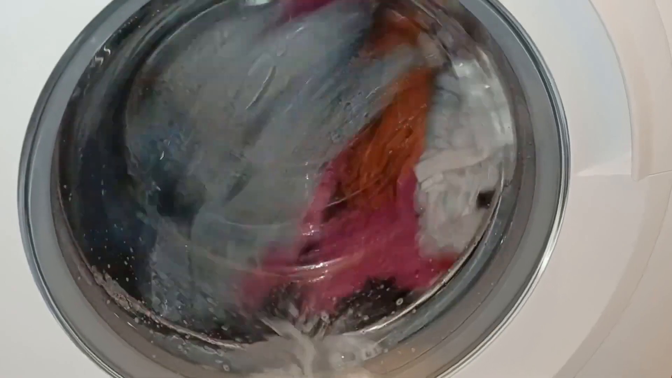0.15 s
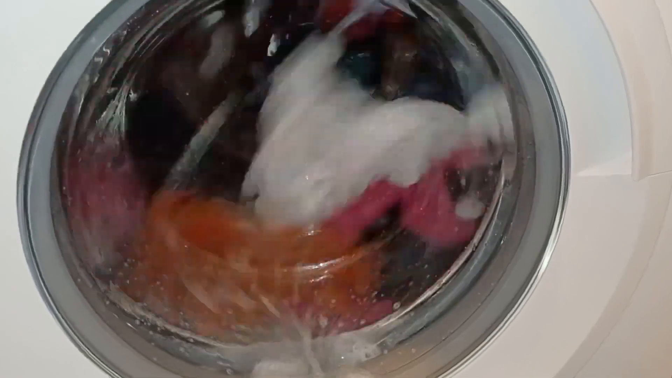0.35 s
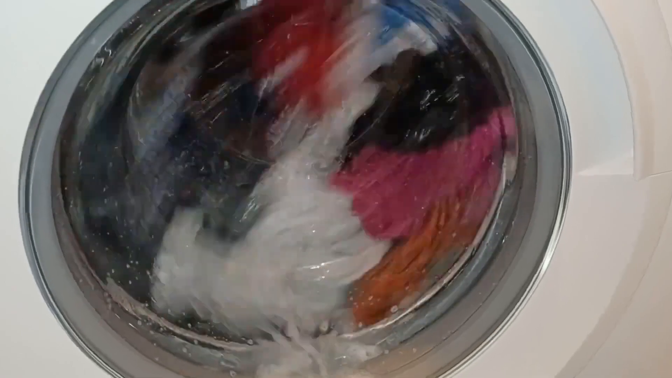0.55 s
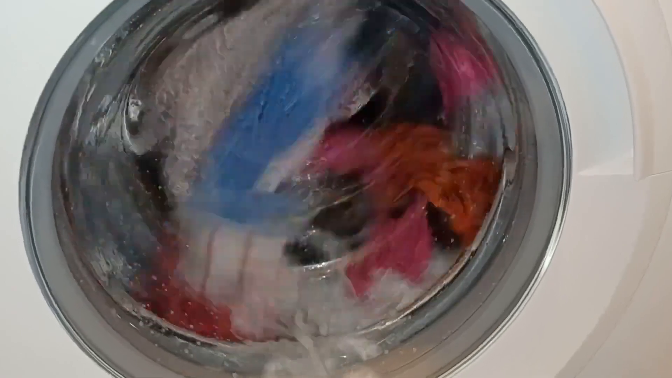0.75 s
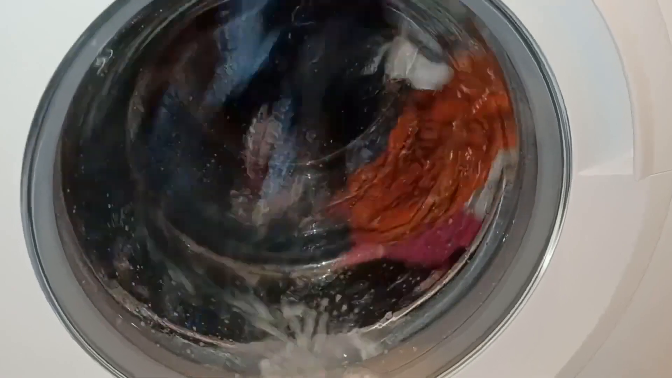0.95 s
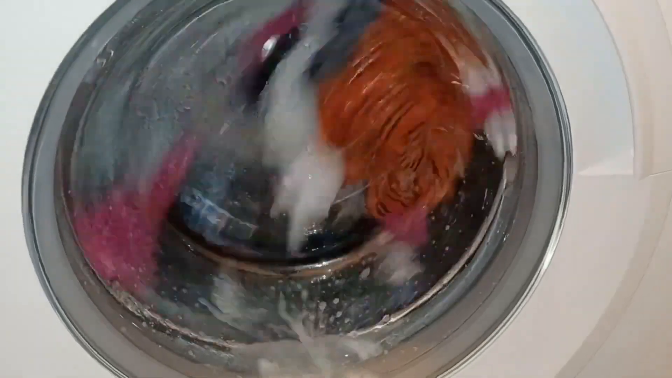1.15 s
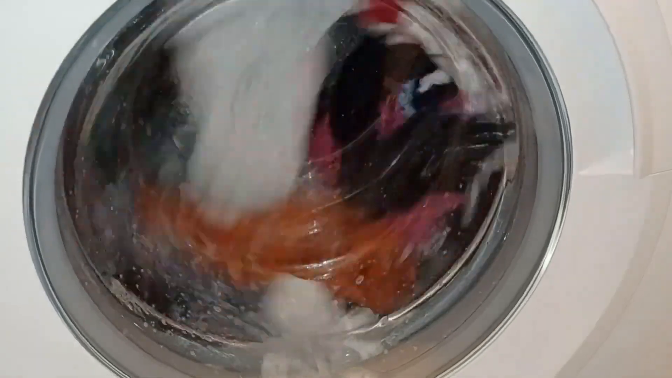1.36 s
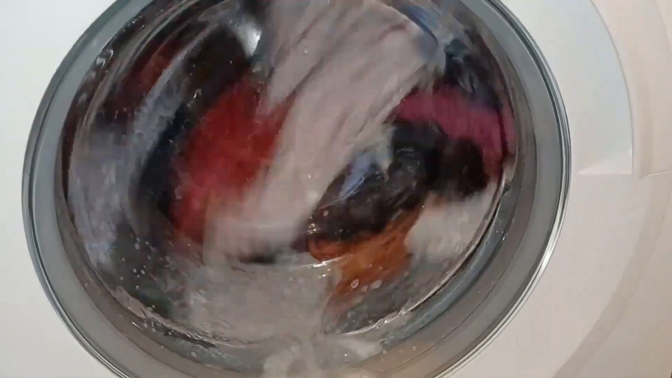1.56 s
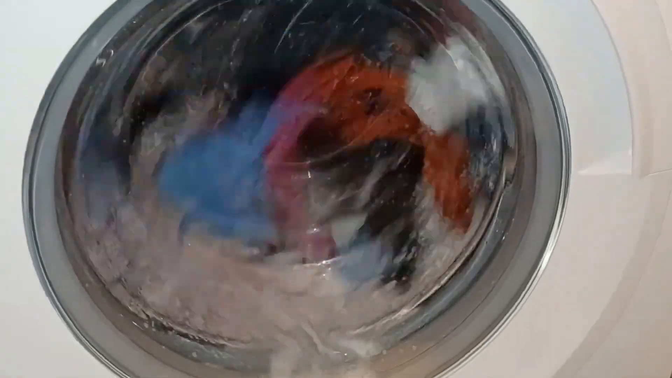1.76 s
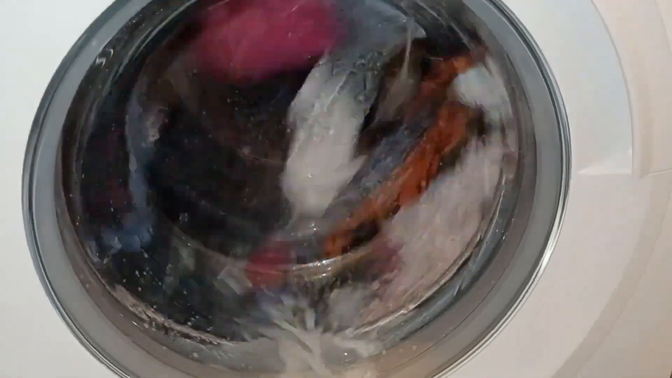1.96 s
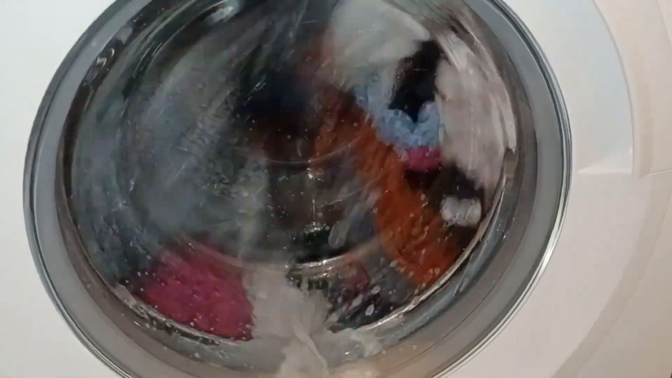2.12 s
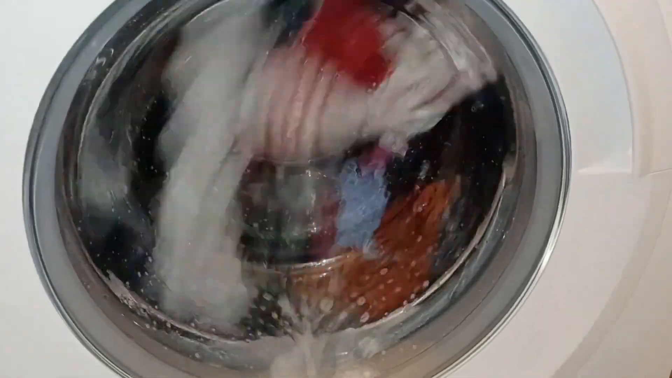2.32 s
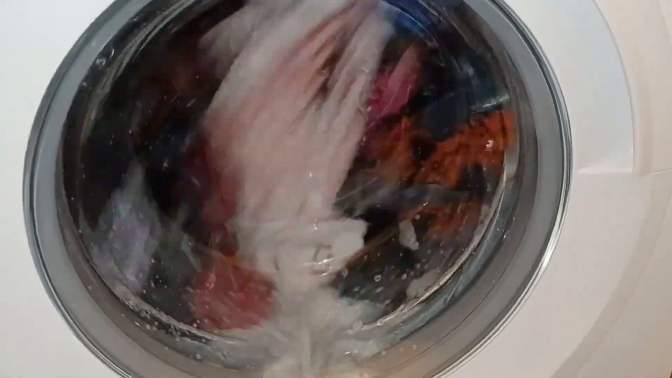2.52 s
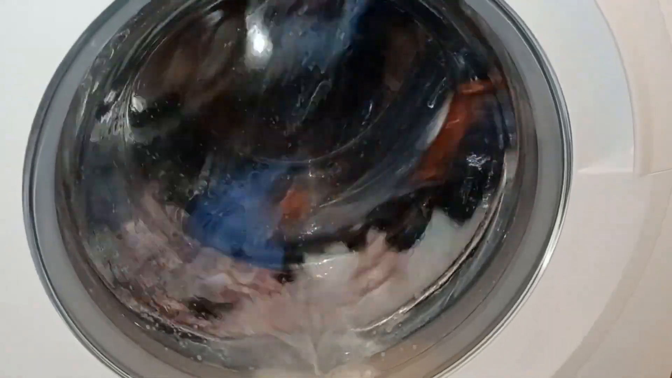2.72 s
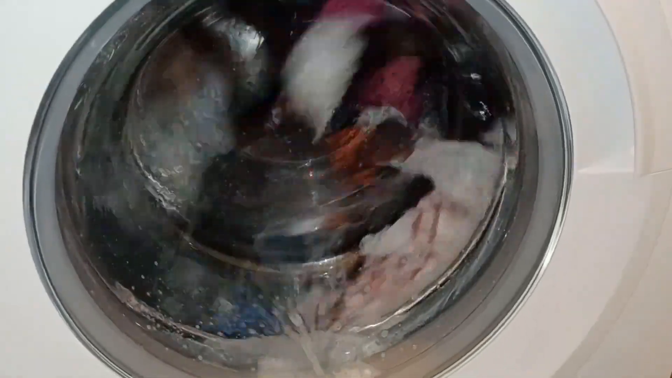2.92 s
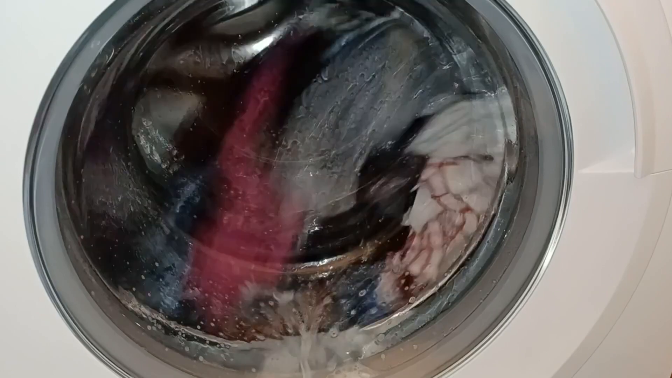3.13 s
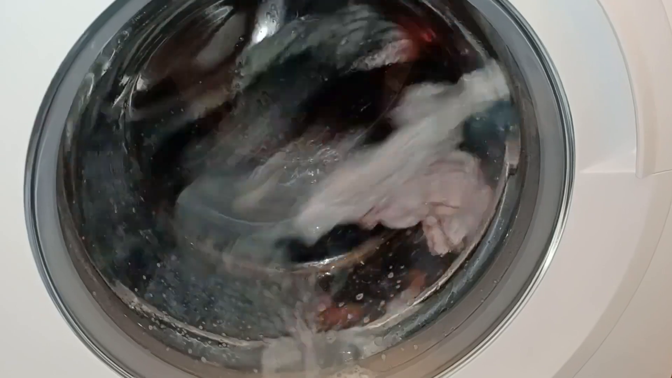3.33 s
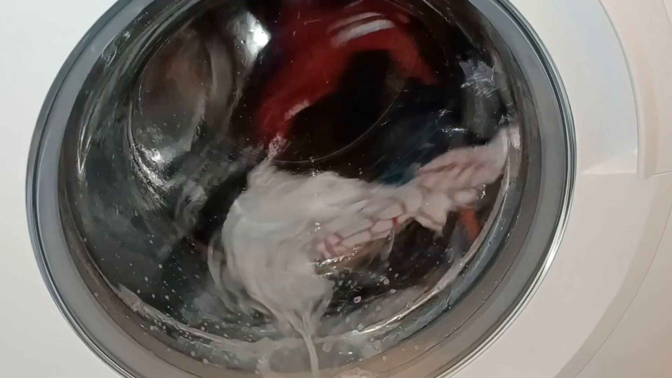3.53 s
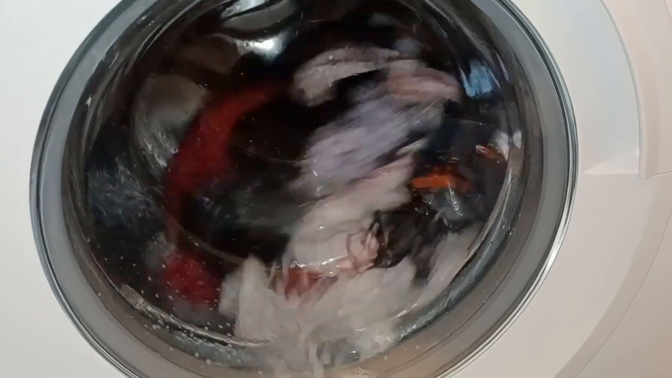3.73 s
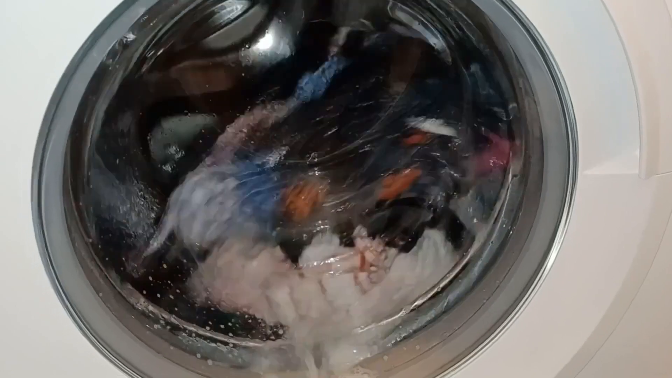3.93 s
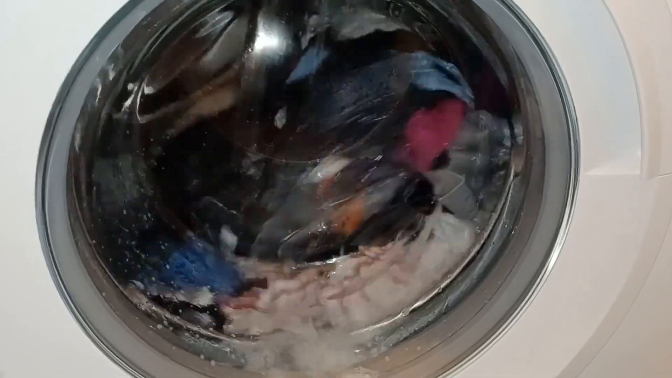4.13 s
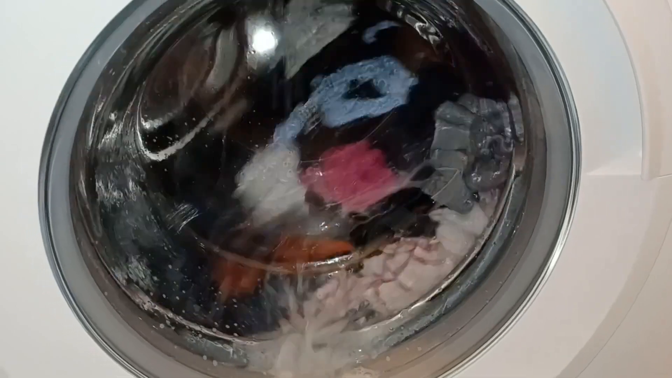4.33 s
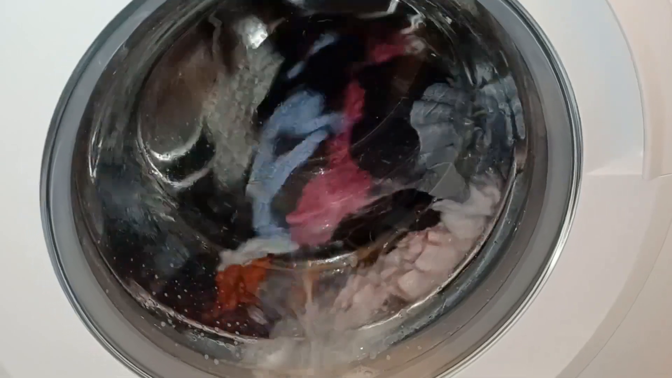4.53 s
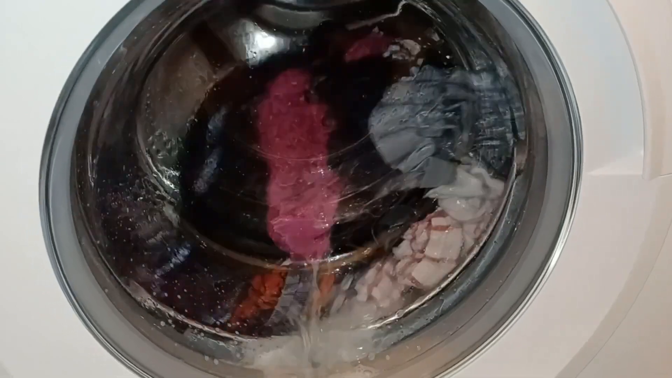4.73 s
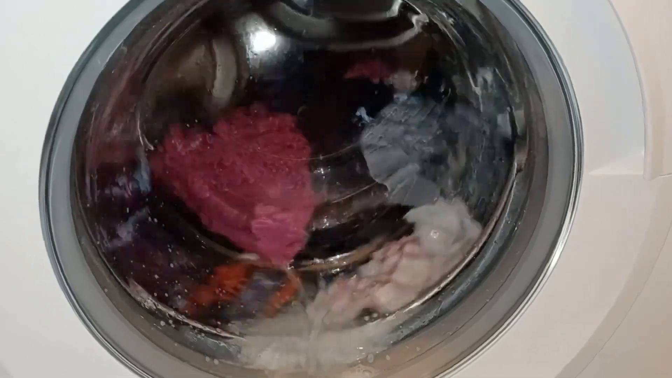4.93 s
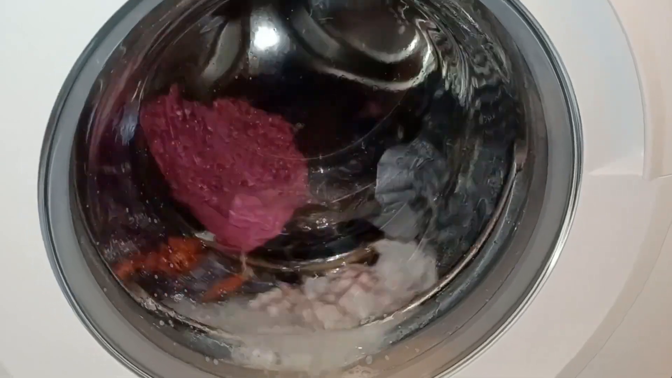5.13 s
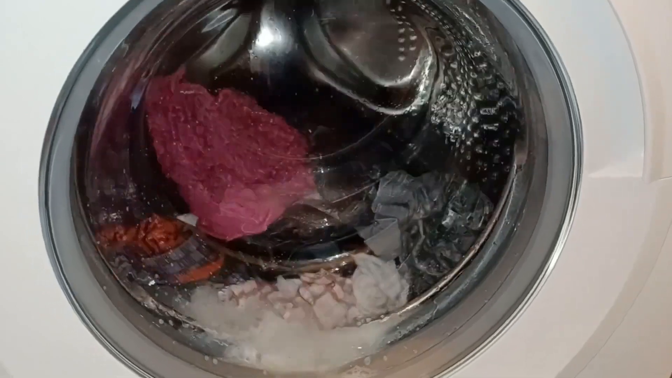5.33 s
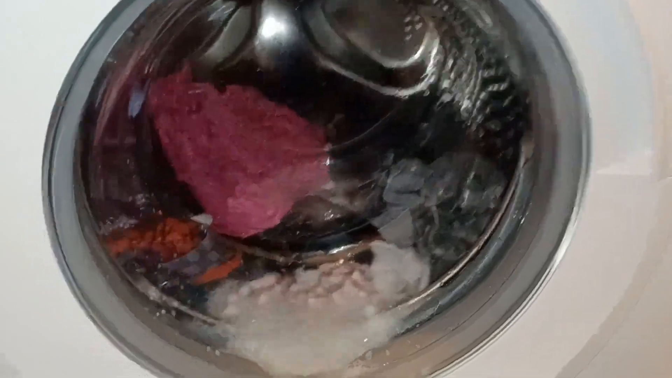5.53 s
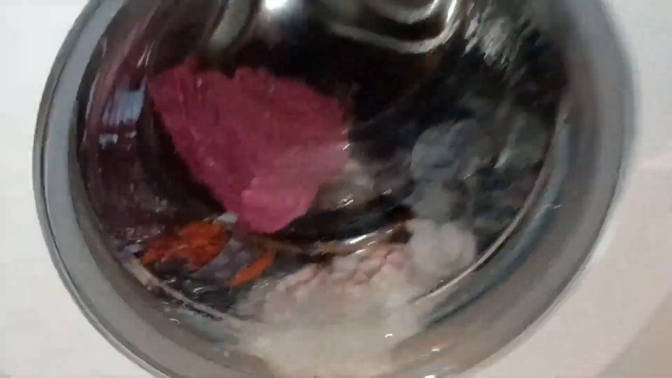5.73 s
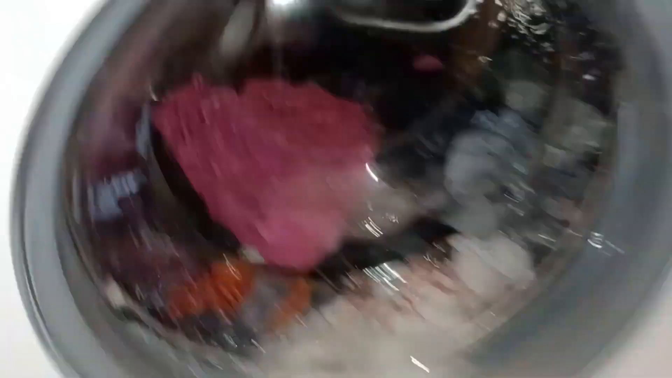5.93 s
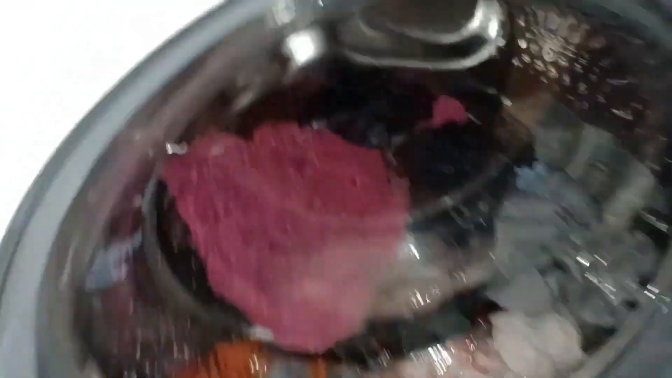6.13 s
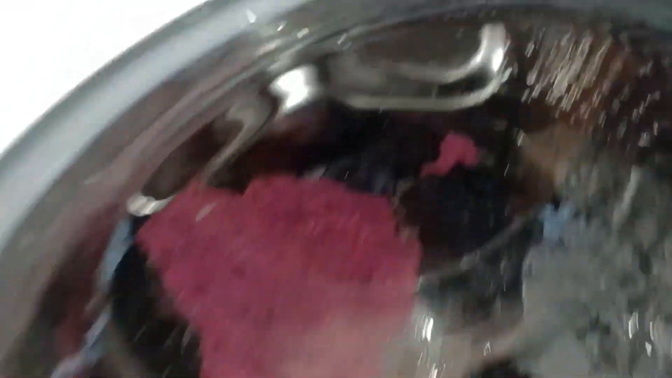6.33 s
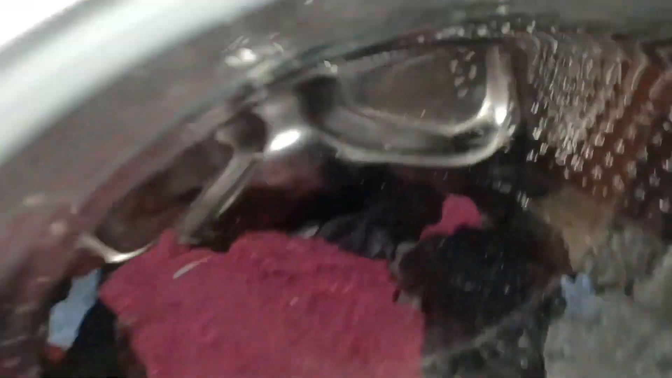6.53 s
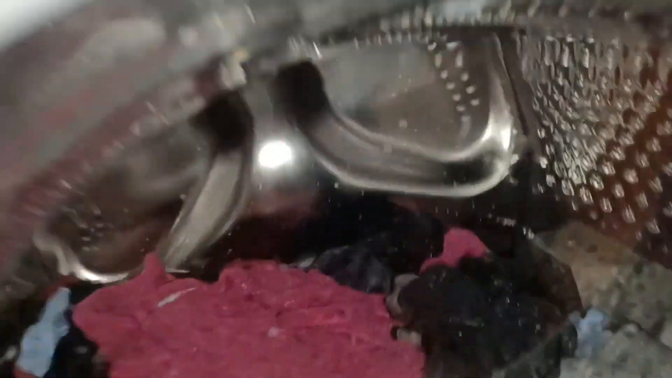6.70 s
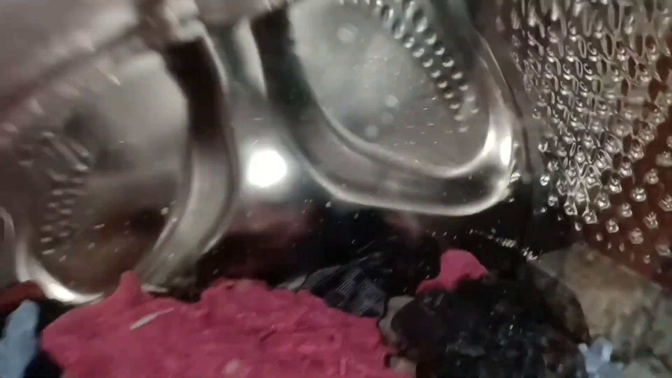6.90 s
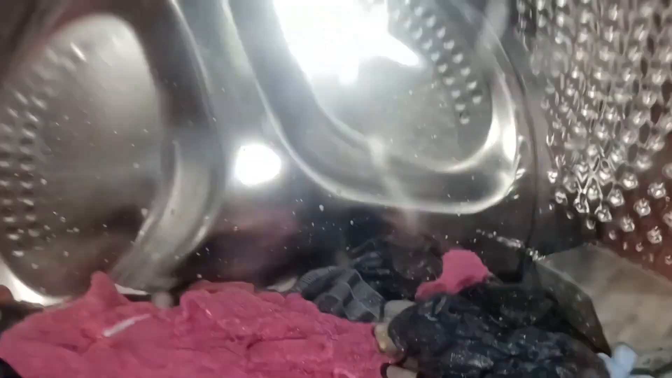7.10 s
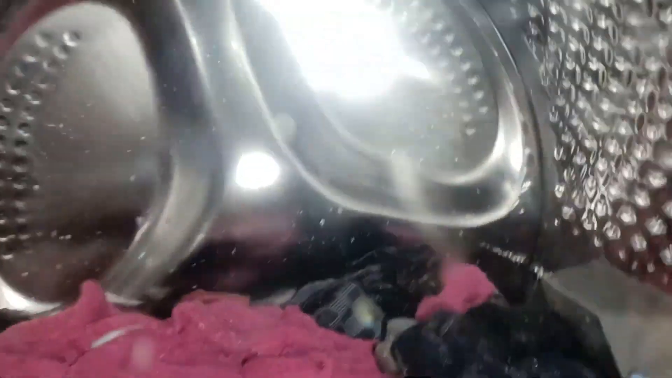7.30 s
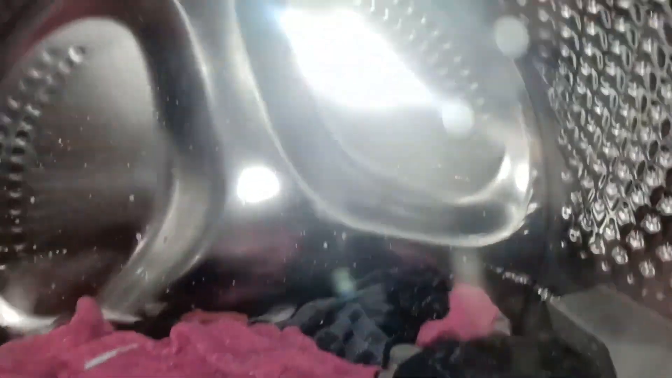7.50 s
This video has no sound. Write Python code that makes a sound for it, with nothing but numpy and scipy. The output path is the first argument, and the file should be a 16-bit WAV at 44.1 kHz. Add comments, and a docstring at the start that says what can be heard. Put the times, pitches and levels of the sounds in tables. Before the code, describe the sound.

Close to a front-loading washer indoors, wet clothes tumble rapidly with dull thuds, water slaps, bubbling slosh and spray on the glass. A faint low motor hum wavers beneath, and buttons tick on metal. Around four seconds the drum slows and stops with a last wet flop. Near quiet follows, then loud low handling bumps and rubbing as the camera moves closer to faintly fizzing foam.

```python
"""Front-loading washer with a handled camera

Wet laundry tumbles in suds over a wavering motor hum; buttons tick on the drum, which slows and stops.
A last fold slides into the water and foam is left fizzing. A hand then carries the camera up to the
door glass, rubbing and bumping its case. Textures and blows are noise bursts coloured by source and
place; bubbles, hum and case are decaying or steady sinusoids."""
import sys
import numpy as np
from scipy import signal
from scipy.fft import rfft, irfft, next_fast_len
from scipy.io import wavfile
from scipy.ndimage import uniform_filter1d

SR = 44100
rng = np.random.default_rng(int(sys.argv[2]) if len(sys.argv) > 2 else 0)


def waveform_to_disk(signal):
    """Save audio, clipped to [-1, 1], as 16-bit WAV at the path in sys.argv[1]."""
    frames = np.transpose(np.atleast_2d(signal))
    scaled = np.clip(frames, -1, 1) * 32767
    samples = np.round(scaled).astype(np.int16)
    wavfile.write(sys.argv[1], SR, samples)


N = 337806
TAPS = 16384  # length of one impact, samples
TIME = np.arange(N) / SR
CLOCK = TIME[::64]  # coarse time for gain curves
HZ, AGE = np.fft.rfftfreq(TAPS, 1 / SR), np.arange(TAPS) / SR


def amp(db):
    """Decibels to gain."""
    return 10 ** (np.asarray(db) / 20)


def evened(x):
    """Scales a stereo sound so that its middle has rms 1."""
    return x / np.sqrt(np.mean(x.mean(0) ** 2) + 1e-20)


def read(points, hz):
    """Interpolates a table of (Hz, value) on a log-frequency axis."""
    f, value = np.transpose(points)
    return np.interp(np.log(hz + 1), np.log(f + 1), value)


def level(rows):
    """Turns (s, dB) points into a gain curve that fades out beyond its ends."""
    s, db = np.transpose(rows)
    outside_s = np.maximum(s[0] - TIME, 0) + np.maximum(TIME - s[-1], 0)
    return amp(np.interp(TIME, s, db)) * np.exp(-outside_s / 0.023)


def swells(starts_s, lengths_s, db, rise_s, fall_s, lean_db=0):
    """Joint gain of events that rise, hold and die away; each hold climbs by lean_db."""
    age, length = CLOCK - starts_s[:, None], lengths_s[:, None]
    hold = amp(db[:, None] + lean_db * (np.clip(age / length, 0, 1) - .5))
    gain = hold * np.exp(np.minimum(age, 0) / rise_s - np.maximum(age - length, 0) / fall_s)
    return np.interp(TIME, CLOCK, np.linalg.norm(gain, axis=0))  # events add in power


def add(mix, s, sound):
    """Adds a stereo sound at time s."""
    part = mix[:, max(round(s * SR), 0):][:, :sound.shape[1]]
    part += sound[:, :part.shape[1]]


def causal(db):
    """Minimum-phase filter with this gain: it rings only after the blow."""
    log_gain = np.log(amp(np.maximum(db, -100)))
    circle = np.concatenate([log_gain, log_gain[-2:0:-1]])
    return np.exp(np.conj(signal.hilbert(circle)))[:len(db)]


def colour(spectrum, place, tilt_db=0):
    """Left and right filters: the source's colour, tilted per octave, plus its place's resonances."""
    _, side, resonances = place
    db = read(spectrum, HZ) + tilt_db * np.log2((HZ + 100) / 4000)
    for hz, width_hz, lift_db in resonances:
        reach = .5 + rng.random()  # how well this spot excites the resonance
        db = db + reach * lift_db / (1 + (2 * (HZ - hz) / width_hz) ** 2)
    return np.array([causal(db + sign * read(side, HZ) / 2) for sign in (1, -1)])


def uneven(depth_db, count=44):
    """Random gain over frequency: every spot favours other frequencies."""
    knots_hz = np.geomspace(500, 16000, count)
    return amp(read(np.transpose([knots_hz, depth_db * rng.standard_normal(count)]), HZ))


def burst(filters, place, t60_s, room_db, room_t60_s=0.36):
    """One impact at both microphones: a quick scatter plus the room's tail."""
    fade = amp(-60 * AGE / t60_s) + amp(room_db - 60 * AGE / room_t60_s)
    a, b = rfft(rng.standard_normal((2, TAPS)) * fade)
    same = np.clip(read(place[0], HZ), -1, 1)
    mid, side = np.sqrt((1 + same) / 2) * a, np.sqrt((1 - same) / 2) * b
    sound = irfft(np.array([mid + side, mid - side]) * filters)
    return sound * np.minimum(2 * (1 - AGE / AGE[-1]), 1) ** 2  # tapered end


def impacts(per_s, spread_db):
    """Random train of impulses of either sign, with exponentially scattered levels."""
    hit = np.flatnonzero(rng.random(N) < per_s / SR)
    train = np.zeros(N)
    scatter = np.minimum(rng.exponential(1, len(hit)), 4)
    train[hit] = rng.choice([-1, 1], len(hit)) * amp(spread_db * scatter)
    return train


def steadied(x, span_s):
    """Keeps the grain of a texture but evens its strength over the span."""
    span = max(int(span_s * SR), 2)
    power = uniform_filter1d((evened(x) ** 2).mean(0), span)
    return evened(x / np.sqrt(uniform_filter1d(abs(power), span) + 1e-12))


def patter(spectrum, place, per_s, spread_db, t60_s, room_db, span_s=0.067, uneven_db=0, count=8):
    """Many small impacts on several spots, each spot with its own colour and scatter."""
    size, total = next_fast_len(N + TAPS, True), 0
    for _ in range(count):
        spot = burst(colour(spectrum, place) * uneven(uneven_db), place, t60_s, room_db)
        train = impacts(per_s / count, spread_db)
        total = total + rfft(np.float32(train), size) * rfft(np.float32(spot), size)
    return steadied(irfft(total, size)[:, :N].astype(float), span_s)


def strike(filters, place, db, t60_s, room_db):
    """A single impact whose middle has the given peak level."""
    sound = burst(filters, place, t60_s, room_db)
    return amp(db) * sound / abs(sound.mean(0)).max()


def bubbles(spectrum, low_hz, high_hz, per_s, spread_db, cycles, rise, count=32):
    """Air pockets of many pitches ring briefly, each gliding up as it nears the surface."""
    out = np.zeros((2, N))
    for hz in np.geomspace(low_hz, high_hz, count):
        age = AGE[:4096] * hz / cycles  # in decay times
        ring = np.sin(2 * np.pi * cycles * (age + rise * age ** 2))
        ring = ring * np.exp(-age) * (1 - np.exp(-8 * age))
        train = signal.oaconvolve(impacts(per_s / count, spread_db), ring)[:N]
        train = train * amp(read(spectrum, hz)) * np.sqrt(hz)
        out += [train, np.roll(train, rng.integers(-18, 19))]  # each reaches one microphone first
    return steadied(out, .18)


# Stirring of the water until the drum stops. Each row: time in seconds, level in dB.
CHURN_S_DB = [(0.0, 4), (0.48, 2), (0.56, 0), (0.8, 3), (2.0, 4.5), (2.76, 4), (2.95, -2), (3.3, 0),
              (3.9, -3.5), (4.37, -17), (4.6, -8), (4.71, -12), (4.96, -13), (5.17, -30.5), (5.6, -34)]
# Laundry ploughing through water. Each row: start in seconds, length in seconds, weight in dB,
# slosh in dB over the weight, spray in dB over the weight.
SURGES_S_DB = [(0.0, 0.088, -38, -4, -7.5), (0.17, 0.066, -46.5, -2, -3), (0.26, 0.13, -38.5, -4, -4.5),
               (0.419, 0.046, -39, -1, -9), (0.584, .05, -54.5, 9.5, -1.5),
               (0.684, 0.053, -36.5, -1.5, -7.5), (0.797, 0.032, -46.5, -2, 0.5),
               (0.883, .1, -37, -7, -11.5), (1.049, 0.17, -40.5, -1.5, -9.5),
               (1.258, 0.087, -40.5, -5, -7.5), (1.388, 0.02, -35.5, -9.5, -17),
               (1.458, .05, -46.5, -0.5, 1), (1.549, 0.13, -42.5, -2, -5), (1.749, 0.034, -46.5, -2.5, 1),
               (1.818, 0.13, -37.5, -4.5, -11), (1.992, 0.061, -36, -5, -16), (2.164, 0.074, -45, -2.5, -4),
               (2.242, .085, -42, -2, -11.5), (2.396, 0.046, -40, -6, -5.5), (2.507, 0.06, -43.5, -6, -9),
               (2.599, 0.029, -39.5, -1.5, -0.5), (2.655, 0.09, -38, -2.5, -13.5),
               (3.021, 0.049, -43, -6, -13), (3.121, 0.13, -42, -3, -6.5),
               (3.326, 0.089, -44.5, -4.5, -5.5), (3.497, 0.11, -46.5, 0, -6.5),
               (3.635, 0.12, -45, -6, -12), (3.824, 0.092, -50, -1.5, -4.5), (4.03, 0.068, -51.5, 0, -5.5),
               (4.167, 0.11, -56, -6.5, -9), (4.405, 0.029, -71, -12, 5.5), (4.5, 0.082, -53, -5, -15),
               (4.783, .02, -53.5, 3, -1), (4.834, 0.043, -42.5, 0, -8.5), (4.91, 0.024, -46, -9, -16),
               (5.368, 0.16, -68.5, -16.5, -30)]
# Flung drops showering the door glass. Each row: start in seconds, length in seconds, level in dB.
SHOWERS_S_DB = [(0.0, 0.0092, -51), (0.445, .02, -60), (1.325, 0.018, -60), (1.448, .025, -50.5),
                (3.15, 0.09, -66), (3.5, 0.67, -80), (4.235, .05, -73), (4.405, 0.076, -77)]


def tumbling():
    """Gains of cloth, water, spray and mist: surges over churn, spray leaning early and water late."""
    s, length_s, weight, slosh, spray = np.transpose(SURGES_S_DB)
    churn = level(CHURN_S_DB)
    rise_s, fall_s = 0.024, 0.041
    cloth_surge = swells(s, length_s, weight, rise_s, fall_s, lean_db=-0.5)
    water_surge = swells(s, length_s, weight + slosh, rise_s, fall_s, lean_db=1.0)
    spray_surge = swells(s, length_s, weight + spray, rise_s, fall_s, lean_db=-1.0)
    cloth = np.hypot(amp(-48.5) * churn, cloth_surge)
    water = np.hypot(amp(-54) * churn, water_surge)
    drops = np.hypot(amp(-62.0) * churn ** 1.25, spray_surge)
    thrown = amp(-10.5) * drops ** 1.19 * churn ** .6  # grows faster than the spray, needs a fast drum
    film = amp(-78.5) * churn ** .4  # water sheeting down the glass
    showers = swells(*np.transpose(SHOWERS_S_DB), rise_s=0.01, fall_s=0.023)
    return cloth, water, drops, np.hypot(np.hypot(thrown, film), showers)


def deepened(cloth, low_hz=85, high_hz=180, bass_db=-1.0, slowness=0.24):
    """The weaker the churn, the softer the fall and the more bass in its thud."""
    band = signal.butter(2, [low_hz, high_hz], "bandpass", fs=SR, output="sos")
    bass = signal.sosfiltfilt(band, cloth)
    gain = amp(bass_db) * np.maximum(level(CHURN_S_DB), amp(-21)) ** -slowness
    return cloth + bass * (gain - 1)


# Stereo likeness of the machine. Each row: frequency in Hz, left-right likeness (clipped to -1..1).
DRUM_LIKENESS = [(60, 0.3), (130, 2.5), (290, 0.64), (640, 0.38), (1400, -0.06), (15000, 0)]
# Stereo balance of the machine. Each row: frequency in Hz, left minus right in dB.
DRUM_BALANCE_DB = [(60, 0.0), (92, -1.5), (140, 0), (210, -4), (330, -1), (500, 3), (770, -2.5),
                   (1170, -0.5), (1790, -2), (2740, -7.5), (4190, -14.5), (6410, -1), (9810, -6.5),
                   (15000, -9)]
# Resonances of tub, drum and door. Each row: frequency in Hz, width in Hz, lift in dB.
TUB_MODES = [(149.8, 29, 10), (213, 47, 7.5), (273.6, 35, 7), (436.3, 10, 7), (531, 81, 6), (651, 170, 7.5),
             (830, 50, 2), (2018, 33, 8), (2531, 480, 8.5), (3870, 250, 4.5), (4640, 600, 2),
             (6830, 160, 7)]
DRUM = DRUM_LIKENESS, DRUM_BALANCE_DB, TUB_MODES
# Colours of cloth, churned water, drops and fine mist. Each row: frequency in Hz, density in dB per Hz.
CLOTH_DB = [(25, -18), (42, -13), (62, -13.5), (125, -2.5), (185, -8), (240, -1), (330, -2), (430, -11.5),
            (700, -42), (2000, -73)]
SLOSH_DB = [(150, -30), (330, -4), (480, -4.5), (750, -1.5), (1100, -2), (1500, -6.5), (1900, -15),
            (2500, -23), (5000, -41.5)]
SPRAY_DB = [(500, -32.5), (1100, -5), (1600, 5), (2300, -2.5), (3100, -5), (4000, -6.5), (5000, -4.5),
            (6000, -11.5), (7000, -16.5), (8000, -37), (16000, -35)]
MIST_DB = [(3000, -39.5), (6500, -0.5), (8200, -9.5), (9500, -4), (11500, 1), (13500, -5.5), (16000, -7.5)]


def laundry():
    """Cloth thuds in the tub, water churns and bubbles, drops and larger splats pelt drum and door."""
    thuds = patter(CLOTH_DB, DRUM, per_s=300, spread_db=2.5, t60_s=0.046, room_db=-19, span_s=.06)
    cloth = amp(-1.0) * deepened(thuds)
    water = amp(-2.5) * patter(SLOSH_DB, DRUM, per_s=700, spread_db=1.5, t60_s=0.041, room_db=-20.0,
                               uneven_db=4.0)
    water += amp(-5.5) * bubbles(SLOSH_DB, low_hz=299.6, high_hz=1897, per_s=260, spread_db=3.0,
                                 cycles=9.4, rise=0.021)
    spray = amp(-4.5) * patter(SPRAY_DB, DRUM, per_s=800, spread_db=2.5, t60_s=0.019, room_db=-6.5,
                               span_s=.1, uneven_db=1.0)
    splats = patter(SPRAY_DB, DRUM, per_s=70, spread_db=2, t60_s=.07, room_db=-21.5,
                    span_s=0.28, uneven_db=5.5, count=20)
    small_bubbles = bubbles(SPRAY_DB, low_hz=1397, high_hz=5650, per_s=90, spread_db=3.0,
                            cycles=32, rise=0.0074, count=22)
    spray += amp(-6.5) * splats + amp(-10.5) * small_bubbles * amp([[2], [-3]])  # left, right dB
    mist = amp(0.5) * patter(MIST_DB, DRUM, per_s=600, spread_db=3.5, t60_s=.018, room_db=-4.0,
                             span_s=0.17, uneven_db=-1.0, count=12)
    return sum(layer * gain for layer, gain in zip((cloth, water, spray, mist), tumbling()))


# The motor straining to lift a bundle. Each row: start in seconds, length in seconds, hum in dB.
LIFTS_S_DB = [(0.217, 0.15, -42), (0.77, .03, -51), (0.97, .13, -52), (1.49, .21, -43.5),
              (2.182, 0.39, -50), (2.52, 0.096, -47), (3.176, 0.27, -51), (3.75, 0.026, -54)]


def strain(rise_s=.025, fall_s=.05):
    """Motor loudness: a base that follows the churn, and a swell at each lift."""
    return np.hypot(amp(-69) * level(CHURN_S_DB), swells(*np.transpose(LIFTS_S_DB), rise_s, fall_s))


def motor(hz=78, waver=.05):
    """A low hum, fundamental and octave, whose speed wavers at random."""
    drift = uniform_filter1d(rng.standard_normal(N), 4000)
    turns = np.cumsum(hz * (1 + waver * drift / drift.std())) / SR
    hum = np.sin(2 * np.pi * turns) + amp(-7) * np.sin(4 * np.pi * turns)
    return hum * strain() * amp([[-.5], [2]])  # left, right dB


# Colour of the room's murmur. Each row: frequency in Hz, density in dB per Hz.
QUIET_DB = [(25, -26.5), (70, -7), (150, -3), (260, -9), (380, -21.5), (550, -15.5), (1000, -17),
            (3200, -30.5), (4600, -14), (8000, -27), (11500, -23.5), (16000, -35.5)]


def quiet():
    """The room's low murmur with a faint fizz, gently swelling and sinking at random."""
    knots_s = np.arange(0, TIME[-1] + .15, .15)
    swell = amp(1.3 * np.interp(TIME, knots_s, rng.standard_normal(len(knots_s))))
    murmur = patter(QUIET_DB, DRUM, per_s=1900, spread_db=2.0, t60_s=.04, room_db=-17.5,
                    span_s=0.46, count=5)
    return amp(-75.0) * swell * murmur


# Stereo likeness at the hand. Each row: frequency in Hz, left-right likeness.
HAND_LIKENESS = [(60, 0.87), (130, 0.96), (290, 0.8), (640, -0.11), (1410, -0.21), (3100, -0.12),
                 (6820, 0.13), (15000, 0.01)]
# Stereo balance at the hand. Each row: frequency in Hz, left minus right in dB.
HAND_BALANCE_DB = [(60, 0), (92, -8), (140, -6.5), (210, -3.5), (330, 3), (500, -1.5), (770, 2.5),
                   (1170, -3.5), (1790, -2.5), (2740, -9.5), (4190, -14.5), (6410, -1.5), (9810, -5.5),
                   (15000, -5)]
# Resonances of the camera case under a sliding hand. Each row: frequency in Hz, width in Hz, lift in dB.
SHELL_MODES = [(113, 26, 3), (200, 22, 4), (228, 22, 1), (313.5, 25, 4), (413, 22, 3), (452, 25, 2),
               (597, 35, 4)]
CAMERA = HAND_LIKENESS, HAND_BALANCE_DB, SHELL_MODES
# Colour of bursting foam. Each row: frequency in Hz, density in dB per Hz.
FIZZ_DB = [(1500, -14), (3200, -12), (4500, -0.5), (5800, -3.5), (8000, -13), (10000, -8.5), (11800, -1.5),
           (14000, -11.5), (16000, -11.5)]
# Fizz, growing as the camera nears the glass. Each row: time in seconds, level in dB.
FOAM_S_DB = [(0.0, -98), (5.55, -89), (5.75, -78), (6.8, -72.5), (7.66, -74)]


def foam():
    """Tiny bubbles burst behind the door as a dense patter, louder as the camera comes close."""
    fizz = patter(FIZZ_DB, CAMERA, per_s=3000, spread_db=4.0, t60_s=.018, room_db=-21.5,
                  span_s=.2, count=3)
    return level(FOAM_S_DB) * fizz


# Levels of folds, splashes and fasteners; thuds, sprays and mists are lowered slightly in landings().
# Heavy folds landing. Each row: time in seconds, thud in dB, water slap in dB,
# thud brightness in dB per octave.
FLOPS_S_DB = [(.284, -27, -33.5, -1), (0.467, -26, -49, 5.5), (.669, -35, -34.5, -7),
              (.734, -28, -37.5, -1.5), (1.37, -21.5, -32, 4.5), (1.535, -30, -26.5, -14),
              (1.57, -27.5, -31, -2.5), (1.849, -29.5, -42, -5.5), (2.236, -29.5, -33.5, 4),
              (2.627, -27, -37, -7), (3.229, -29, -34.5, -3), (4.478, -53, -43, 1),
              (4.817, -35, -36, -10.5), (4.844, -38.5, -40.5, -7), (5.466, -48, -68, -6)]
# Sharp splashes. Each row: time in seconds, level in dB, mist in dB over that level.
SPLASHES_S_DB = [(0.0627, -32.5, -24), (0.176, -32.5, -13), (0.2418, -31.5, -13), (0.429, -27, -18),
                 (0.72, -38.5, -7), (0.8665, -31, -20), (0.938, -28, -15.5), (1.3526, -31, -17),
                 (1.6768, -30, -18), (1.742, -28, -14.5), (1.95, -28.5, -16), (2.337, -28.5, -13),
                 (2.592, -37, -5), (3.209, -30.5, -19), (3.396, -36, -33), (4.006, -41, -32),
                 (4.816, -34.5, -23)]
# Buttons and zips on steel or glass. Each row: time in seconds, peak in dB, brightness in dB per octave.
TICKS_S_DB = [(0.346, -23, -10.5), (.784, -36, 5), (1.256, -36.5, 7), (1.471, -28, -10), (1.61, -19, -5),
              (1.6135, -20.5, 3), (1.783, -29.5, -1.5), (2.432, -28, 6), (2.440, -37, 2),
              (2.465, -32.5, -4), (3.296, -29.5, -4.5), (3.331, -32, -7)]
# Colour of a hard fastener. Each row: frequency in Hz, density in dB per Hz.
BUTTON_DB = [(600, -38), (1900, 1), (2900, -12), (3700, -1.5), (5000, -1.5), (6000, -13), (7000, -8),
             (8200, -29), (11000, -15.5), (16000, -22)]


def landings():
    """Single noise bursts: heavy folds, splashes and hard fasteners stand out from the churn."""
    out = np.zeros((2, N))
    water, spray, mist = colour(SLOSH_DB, DRUM), colour(SPRAY_DB, DRUM), colour(MIST_DB, DRUM)
    for s, thud_db, slap_db, bright in FLOPS_S_DB:
        thud = colour(CLOTH_DB, DRUM, bright)
        add(out, s, strike(thud, DRUM, thud_db - 1.0, t60_s=0.15, room_db=-21.5))
        add(out, s, strike(water, DRUM, slap_db, t60_s=0.54, room_db=-16.0))
    for s, db, mist_db in SPLASHES_S_DB:
        add(out, s, strike(spray * uneven(depth_db=6.5), DRUM, db - 4.0, t60_s=0.082, room_db=-2))
        add(out, s, strike(mist, DRUM, db + mist_db - 0.5, t60_s=.1, room_db=-11.5))
    for s, db, bright in TICKS_S_DB:
        tick = colour(BUTTON_DB, DRUM, bright) * uneven(depth_db=-1.5)
        add(out, s, strike(tick, DRUM, db, t60_s=.022, room_db=-16.5))
    return out


# Sliding speed of the hand over the camera. Each row: time in seconds, speed in dB.
SLIDE_S_DB = [(5.58, -27), (5.68, -20), (5.9, -6), (5.97, 1), (6.2, 0), (6.34, 5.5), (6.5, -2.5),
              (6.68, -9), (6.84, -4.5), (7.08, -15.5), (7.66, -25.5)]
# Grip pressing on the case. Each row: start in seconds, length in seconds, pressure in dB,
# scrape in dB over the pressure.
GRIPS_S_DB = [(5.675, 0.018, -61, -20), (5.89, 0.027, -45.5, -19), (5.933, 0.017, -25.5, -19.5),
              (5.983, 0.042, -39.5, -9), (6.258, 0.204, -38, -20), (6.477, 0.018, -31, -17.5),
              (6.556, 0.046, -35.5, -11.5), (6.756, 0.075, -34.5, -13.5), (6.936, 0.065, -48.5, -26),
              (7.127, 0.044, -36.5, -23), (7.205, 0.029, -44, -23), (7.293, 0.023, -56, -28),
              (7.594, .06, -63, -7.5)]


def handling(rise_s=.004, fall_s=.03, hiss_fall_db_per_s=6.5):
    """Gains of rumble, scrape, rub and hiss from grip pressure and sliding; the hiss sinks steadily."""
    s, length_s, pressure, scrape = np.transpose(GRIPS_S_DB)
    slide = level(SLIDE_S_DB)
    press = swells(s, length_s, pressure, rise_s, fall_s)
    drag = swells(s, length_s, pressure + scrape, rise_s, fall_s, lean_db=3.5)
    rumble = np.hypot(press, amp(-43.5) * slide ** 1.6)
    rasp = np.hypot(drag, amp(-63) * slide)
    rub = np.hypot(amp(-25) * press * slide ** 0.73, amp(-65) * slide ** 1.07)
    sinking = amp(-hiss_fall_db_per_s * np.maximum(TIME - s[0], 0))
    return rumble, rasp, rub, sinking * np.hypot(amp(-27) * press, amp(-54.5) * slide)


# Colours of rumble, scrape, dry rub and hiss. Each row: frequency in Hz, density in dB per Hz.
RUMBLE_DB = [(25, -26.5), (60, -12), (115, 1), (170, -5), (225, -4.5), (290, -9.5), (350, -16), (460, -26),
             (620, -39), (4000, -82)]
SCRAPE_DB = [(150, -17), (330, -9.5), (450, 4.5), (620, -9), (820, -5), (970, -12), (1200, -19.5),
             (4000, -66)]
RUB_DB = [(200, -26), (500, 3), (1000, -2), (1600, -2.5), (2500, -0.5), (3400, -5), (6000, -10.5),
          (16000, -65)]
HISS_DB = [(1500, -16), (3400, -10), (4500, 1), (5800, -1.5), (8000, -11.5), (10000, -5.5), (11800, -0.5),
           (14000, -9), (16000, -12.5)]


def hand():
    """Skin slips over the camera: rumble and scrape through the case, a dry rub and a fine hiss."""
    rumble = amp(-0.5) * patter(RUMBLE_DB, CAMERA, per_s=600, spread_db=1.5, t60_s=0.068, room_db=-22,
                                span_s=0.035)
    scrape = amp(-0.5) * patter(SCRAPE_DB, CAMERA, per_s=500, spread_db=-0.5, t60_s=0.024, room_db=-28,
                                span_s=0.053, count=4)
    rub = amp(4.0) * patter(RUB_DB, CAMERA, per_s=3000, spread_db=-3, t60_s=0.012, room_db=-30.5, count=4)
    hiss = amp(1.0) * patter(HISS_DB, CAMERA, per_s=8000, spread_db=6, t60_s=0.034, room_db=-22)
    return sum(layer * gain for layer, gain in zip((rumble, scrape, rub, hiss), handling()))


# Bumps on the case. Each row: time in seconds, peak in dB, click in dB over the peak,
# click brightness in dB per octave.
BUMPS_S_DB = [(5.934, -12, -20, 7), (5.9408, -29, -32, 3), (6.237, -23.5, -27, 1), (6.257, -35.5, 0, 10),
              (6.273, -23, -29, 6), (6.316, -22, -16, 8), (6.373, -19.5, -33, 9), (6.408, -25.5, -19, 2),
              (6.475, -16.5, -33, 3), (6.562, -20.5, -16, -7), (6.731, -31.5, -30, 0),
              (6.748, -25.5, -29, 5), (6.764, -33.5, -14.5, -1.5), (6.780, -24.5, -17, 10),
              (6.968, -37, -31, 10), (7.121, -27.5, -20.5, 10)]
# Ringing modes of the case. Each row: frequency in Hz, level in dB, t60 in seconds.
CASE_MODES = [(93, -4, 0.015), (129, 8.5, 0.064), (160, 3, 0.035), (216.2, -3.5, 0.19), (272, -29, 0.013),
              (374, -28, 0.048), (443, -25, 0.035), (800, -46, .06)]


def bumps():
    """Each soft knock rings the case's damped modes and carries a faint click."""
    out = np.zeros((2, N))
    contact = 1 - np.exp(-(AGE / .0012) ** 2)  # soft onset
    for s, db, click_db, bright in BUMPS_S_DB:
        detune = 1 + 0.018 * rng.standard_normal(len(CASE_MODES))  # modes vary slightly in pitch at random
        ring = np.zeros(TAPS)
        for (hz, mode_db, t60_s), shift in zip(CASE_MODES, detune):
            ring += amp(mode_db - 60 * AGE / t60_s) * np.cos(2 * np.pi * hz * shift * AGE)
        ring *= contact
        add(out, s, amp(db) * ring / abs(ring).max() * amp([[-1.2], [1.2]]))  # left, right dB
        click = colour(RUB_DB, CAMERA, bright)
        add(out, s, strike(click, CAMERA, db + click_db, t60_s=0.01, room_db=-18.5))
    return out


def scene():
    """The machine, the room and the hand together."""
    return laundry() + motor() + quiet() + foam() + landings() + hand() + bumps()


def record(dry):
    """The microphone's bass roll-off at 50 Hz, then the band limit at 15.9 kHz."""
    thin = signal.sosfilt(signal.butter(7, 50, "highpass", fs=SR, output="sos"), dry)
    band_limit = signal.firwin(511, 15900, window=("kaiser", 9), fs=SR)
    return signal.oaconvolve(thin, band_limit[None], "same")


dry = scene()
out = record(dry)
waveform_to_disk(out)
```